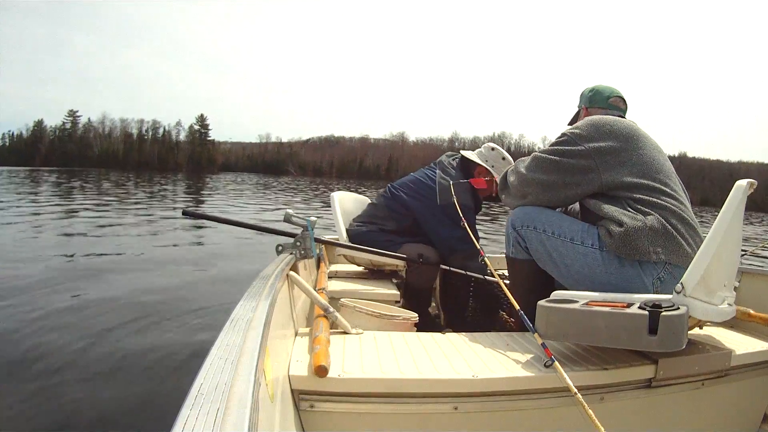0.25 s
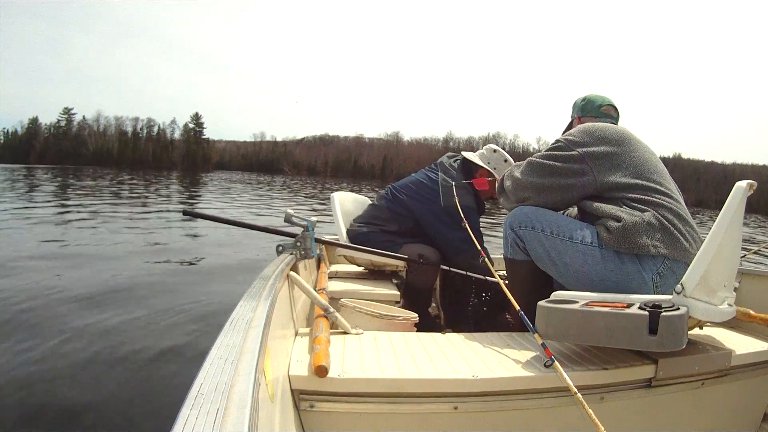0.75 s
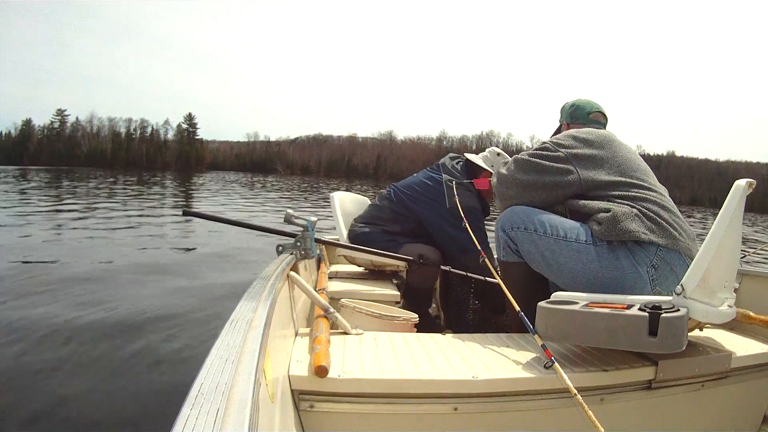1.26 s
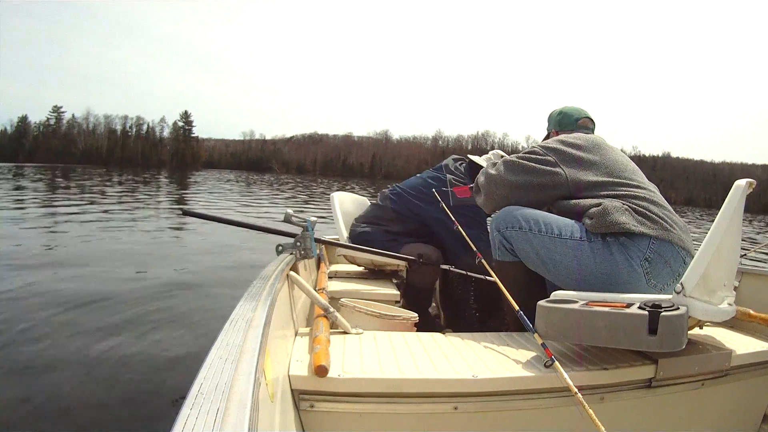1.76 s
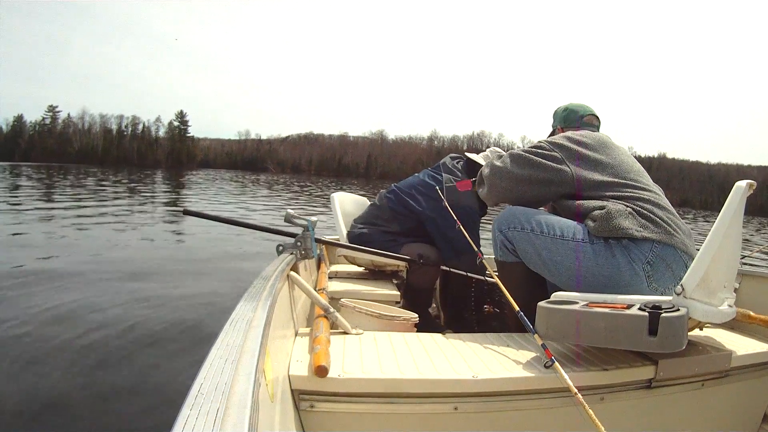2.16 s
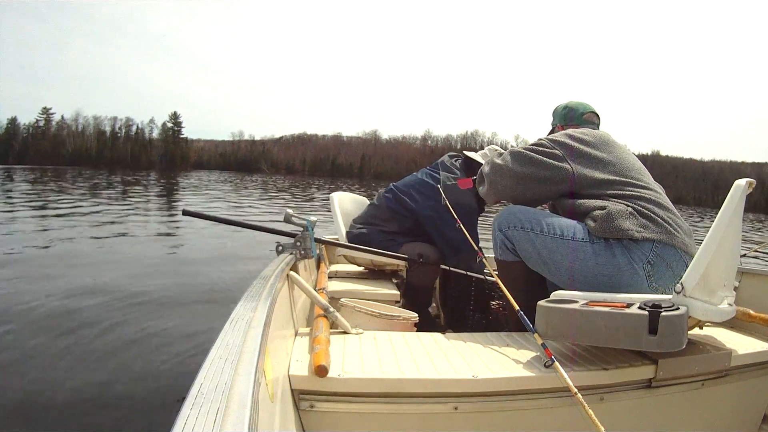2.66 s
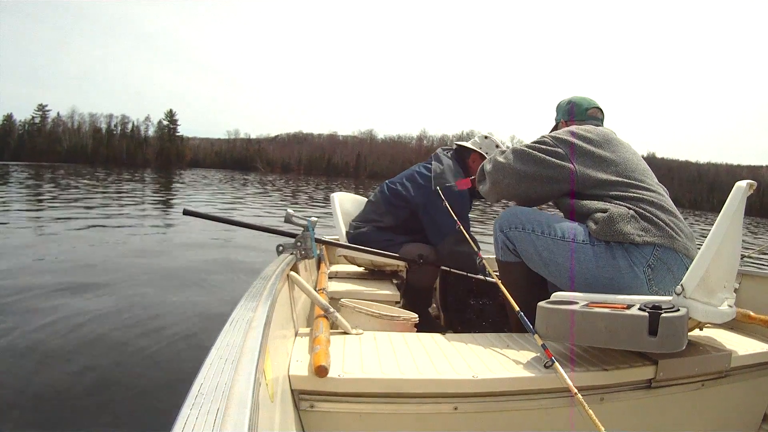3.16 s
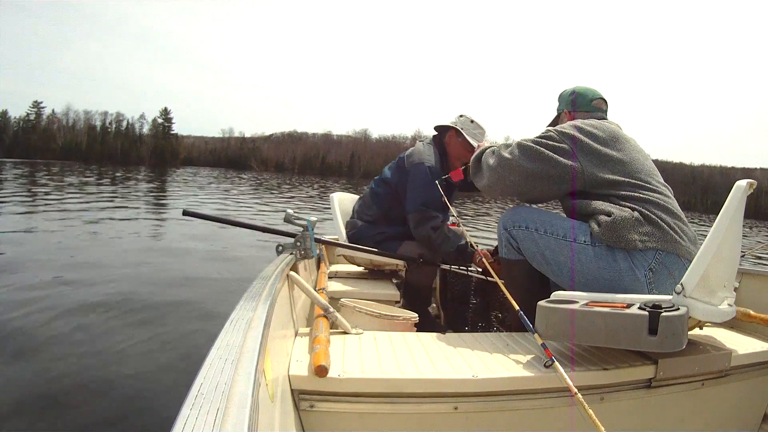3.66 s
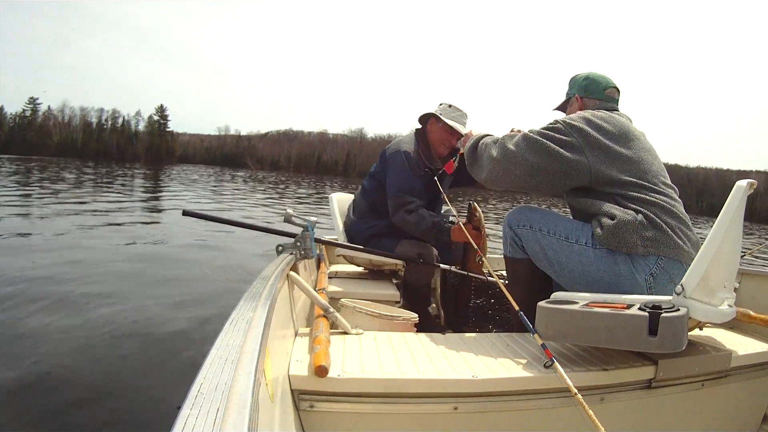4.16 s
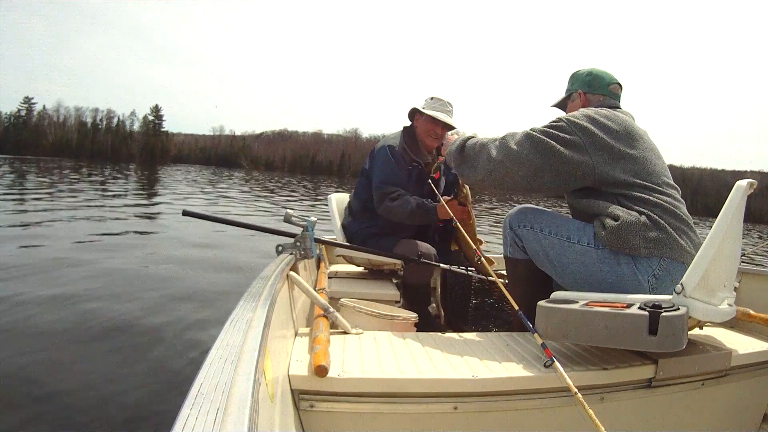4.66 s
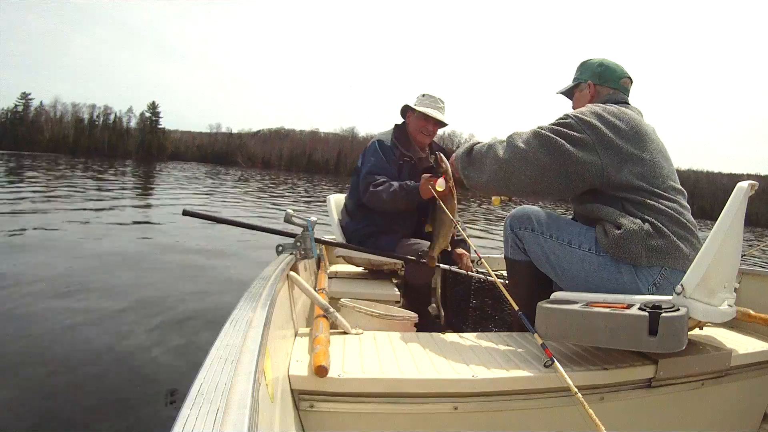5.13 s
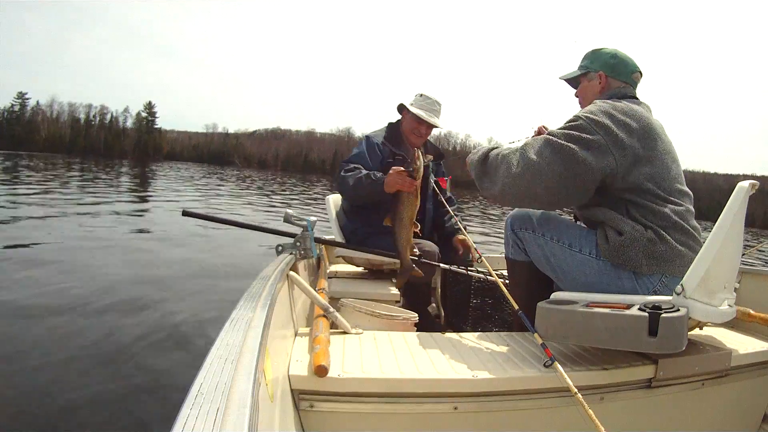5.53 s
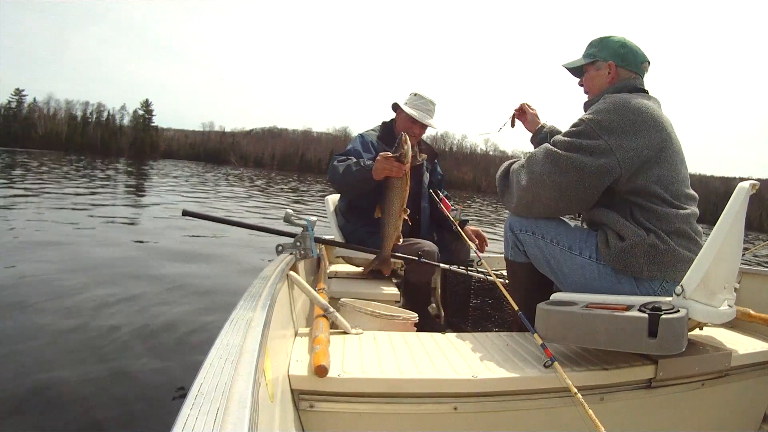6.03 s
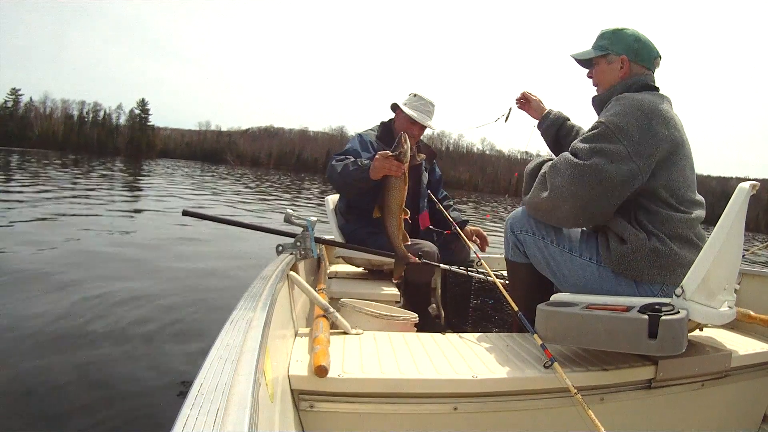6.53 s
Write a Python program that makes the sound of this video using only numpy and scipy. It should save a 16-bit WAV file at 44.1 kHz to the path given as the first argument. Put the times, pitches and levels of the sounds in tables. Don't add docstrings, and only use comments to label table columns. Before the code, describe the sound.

A small outboard idles with a low shuddering throb and a rapid dry plastic rattle, while gear knocks and clunks inside a metal boat.

```python
import sys
import numpy as np
from scipy import signal
from scipy.fft import rfft, irfft
from scipy.io import wavfile
from scipy.ndimage import uniform_filter1d

SR = 44100
rng = np.random.default_rng(int(sys.argv[2]) if len(sys.argv) > 2 else 0)


def master_out(mix):
    frames = np.transpose(np.atleast_2d(mix))
    ceiling = np.clip(frames, -1, 1)
    pcm = np.round(ceiling * 32767).astype(np.int16)
    wavfile.write(sys.argv[1], SR, pcm)


def field_ratio(decibels):
    return 10 ** (np.asarray(decibels, dtype=float) / 20)


N = 299439

TURN_S = 0.0455
HUM_REST_DB = -45


def time_s():
    return np.arange(N) / SR


def rms_one(x):
    return x / np.sqrt(np.mean(x ** 2) + 1e-20)


def drift(rate_hz):
    r = np.exp(-80 * np.pi * rate_hz / SR)
    slow = signal.lfilter([1], [1, -2 * r, r * r], rng.standard_normal(N // 40 + 2002))[2000:]
    return np.interp(np.arange(N) / 40, np.arange(len(slow)), rms_one(slow))


def clicks(at_s, sizes):
    train = np.zeros(N)
    index = np.round(np.asarray(at_s) * SR).astype(int)
    np.add.at(train, np.clip(index, 0, N - 1), sizes)
    return train


def ring(train, hz, t60_s):
    r, w = field_ratio(-60 / (t60_s * SR)), 2 * np.pi * hz / SR
    return signal.lfilter([0, np.sin(w)], [1, -2 * r * np.cos(w), r * r], train + 1e-18)


def resonant_noise(peaks, drive):
    out = 0
    for k, (hz, width_hz, db) in enumerate(peaks):
        r = np.exp(-np.pi * width_hz / SR)
        zeros = [(1 - r * r) / 2, 0, (r * r - 1) / 2]
        poles = [1, -2 * r * np.cos(2 * np.pi * hz / SR), r * r]
        out = out + (-1) ** k * field_ratio(db) * signal.lfilter(zeros, poles, drive)
    return rms_one(out)


def rattle_hits():
    # first_hit_s, turn_ms, hit_count, peak_db
    runs = [(.0328, 48.0, 8, -29.5), (.4174, 45.3, 2, -28.5), (.507, 45.5, 1, -35), (.5578, 46.1, 6, -29.5),
            (.8342, 45.5, 1, -33.5), (.8856, 46.6, 18, -29.5), (1.7283, 46.9, 6, -30.5),
            (2.015, 45.6, 6, -29.5), (2.2904, 50.0, 3, -29.5), (2.4346, 47.8, 14, -30.5),
            (3.1057, 46.6, 6, -31), (3.3919, 46.1, 7, -30.5), (3.7709, 44.9, 4, -30.5),
            (4.1185, 46.0, 4, -31), (4.2981, 52.5, 2, -32), (4.4478, 45.4, 6, -30.5),
            (4.7762, 45.2, 3, -32), (4.9066, 45.5, 1, -39), (5.1185, 46.2, 3, -33), (5.389, 45.5, 1, -40),
            (5.5022, 40.1, 2, -32), (5.5893, 45.5, 1, -32.5), (5.6418, 45.5, 1, -36),
            (5.6943, 45.5, 1, -32), (5.7335, 44.0, 9, -31), (6.1242, 45.9, 2, -32.5), (6.221, 45.5, 1, -49),
            (6.2743, 42.5, 6, -31), (6.531, 44.3, 5, -32)]
    limp_s, last_hit_db, first_hit_db = 0.0008, -2, -2
    hits = []
    for first_s, turn_ms, count, db in runs:
        hits += [(first_s + turn_ms / 1000 * k, db) for k in range(round(count))]
    s, db = np.transpose(hits)
    steps = np.round(np.diff(s) / TURN_S)
    turn, silent = np.r_[0, np.cumsum(steps)], steps > 1
    db = db + last_hit_db * np.r_[silent, True] + first_hit_db * np.r_[False, silent]
    return s - limp_s * (-1) ** turn, turn, db


def crank_turns():
    s, turns, _ = rattle_hits()
    turns = np.r_[-(s[0] + 1) / TURN_S, turns, turns[-1] + (8 - s[-1]) / TURN_S]
    s = np.r_[-1, s, 8]
    return uniform_filter1d(np.interp(time_s(), s, turns), size=6000, mode="nearest")


def shake(turns):
    # start_s, swing_db, limp_db (every other turn, against the swing)
    swings = [(0.0, -13.5, -1), (0.05, -13, -7), (1.21, -10, -7), (1.99, -13.5, -14.5), (2.19, -11, -10),
              (3.31, -15, -14), (3.42, -13, -24), (3.82, -19, -6), (3.88, -30, 0), (3.93, -21, -13),
              (4.12, -13.5, -5.5), (4.74, -18.5, -14.5), (4.84, -22, 1.5), (5.62, -17.5, -4.5),
              (5.82, -10, -19), (6.17, -14, -10), (6.52, -9.5, -20.5), (6.79, -21.5, 2.5)]
    at_s, swing_db, limp_db = np.transpose(swings)
    swing_db, limp_db = (np.interp(time_s(), at_s, db) for db in (swing_db, limp_db))
    third_db = -41 + 6.5 * drift(3.3)

    def swing(db):
        return uniform_filter1d(field_ratio(db), size=2600, mode="nearest")

    def wave(order, lead_turns):
        return np.sqrt(2) * np.cos(2 * np.pi * (order * turns + lead_turns))

    first = swing(swing_db) * wave(0.99, 0.085)
    half = swing(swing_db + limp_db) * wave(3 / 2, 0.19 + 0.23 * drift(0.69))
    third = field_ratio(-6) * swing(third_db) * wave(3, 0.13 * drift(1.5))
    return first + half + third


def rattle():
    # pitch_hz, level_db, t60_s
    housing_modes = [(2500, -12.5, 0.0043), (3080, -45.5, 0.0027), (3556, -27, 0.031), (3700, -7.5, 0.019),
                     (4686, -12.5, 0.0092), (4936, -23.5, 0.026), (5816, -7, 0.012), (6484, -4.5, 0.0049),
                     (6370, -13, 0.013), (7300, -28.5, 0.01), (7990, -19.5, 0.0054), (9120, -12.5, 0.011)]
    s, _, db = rattle_hits()
    chance = rng.standard_normal((len(s), 8))
    db = db + 0.6 * rng.standard_normal(len(s))

    rebound = np.clip(0.34 + 0.2 * chance[:, 0], 0, 0.75)
    rebound_s = s + 0.0029 + 0.0005 * np.clip(chance[:, 1], -2, 2)
    after = field_ratio(db - 14) * chance[:, 6:].T
    hits = clicks(np.r_[s, rebound_s, rebound_s + 0.0013, rebound_s + 0.0031],
                  np.r_[field_ratio(db), field_ratio(db) * rebound, after.ravel()])
    contact = signal.butter(3, [2000, 7800], "band", fs=SR, output="sos")
    hits = signal.sosfilt(contact, hits + 1e-18)

    which = np.searchsorted(s - 0.01, time_s())
    octaves = np.log2(np.array(housing_modes)[:, 0] / 3700)
    dull_db = 0.45 * np.outer(np.r_[0, db - np.median(db)], octaves)
    colour = field_ratio(dull_db - 0.58 + 1.36 * rng.standard_normal(dull_db.shape))
    out = 0
    for k, (hz, mode_db, t60_s) in enumerate(housing_modes):
        out = out + field_ratio(mode_db) * ring(hits * colour[which, k], hz, t60_s)

    back_s = s + 0.0275 + 0.0012 * chance[:, 2]
    lens_fade_db = 0.5 * s
    back = field_ratio(db - 21 - lens_fade_db + 7.6 * np.clip(chance[:, 3], -2, 1.3))
    buzz = field_ratio(db - 16.5) * np.tanh(chance[:, 5:].T)
    lens = clicks(np.r_[back_s, back_s + 0.0006, back_s + 0.0075, s + 0.0002, s + 0.0012, rebound_s],
                  np.r_[back, back * chance[:, 4], back * chance[:, 1] / 3, buzz.ravel()])
    out = out + ring(lens, 13600, 0.004)
    return out + field_ratio(-5) * ring(lens, 14700, 0.004) + field_ratio(-10) * ring(lens, 10500, 0.002)


def hum_level_db():
    # peak_s, peak_db, rise_s, fall_s
    surges = [(0.0, -22, .05, 0.093), (.4, -28.5, 0.37, 0.046), (.68, -34, 0.26, .24),
              (.98, -28.5, 0.068, 0.28), (1.47, -39.5, .17, 0.15), (1.81, -31, 0.19, 0.35),
              (2.48, -34, 0.32, .8), (3.06, -36, 0.046, .8), (3.97, -31.5, 0.15, 0.17),
              (4.27, -32.5, .28, .15), (4.52, -27, .11, .12), (4.78, -32.5, 0.11, 1.6),
              (5.41, -30, .26, .8), (5.94, -34, .18, .17), (6.24, -34, 0.069, 0.12),
              (6.39, -30.5, 0.034, .15), (6.66, -32.5, .06, .26)]
    t, out = time_s(), np.full(N, float(HUM_REST_DB))
    for s, db, rise_s, fall_s in surges:
        away = np.where(t < s, (s - t) / rise_s, (t - s) / fall_s)
        out = np.maximum(out, db + (HUM_REST_DB - db) * away)
    return out


def hum(turns):
    # centre_hz, width_hz, level_db
    air_modes = [(276, 15.9, 2), (301, 28.8, -5), (339.7, 27.6, -17.5), (234.2, 10.7, -14.5),
                 (153.6, 11, -11.5)]
    strength = field_ratio(5.9 * rng.standard_normal(400))[(turns % 400).astype(int)]
    puff = np.exp(-3.5 * (turns % 1)) * strength
    x = resonant_noise(air_modes, rng.standard_normal(N) * (1.03 + 0.35 * puff))
    x = signal.sosfilt(signal.butter(4, 400, fs=SR, output="sos"), x)
    return rms_one(x / uniform_filter1d(x ** 2, size=3500) ** 0.3)


def clatter():
    # centre_hz, width_hz, level_db
    cowling_modes = [(820, 81, -5), (1103.4, 22, 1.5), (1200, 32, -5), (1620, 132, -0.5), (2073, 103, -3.5),
                     (2410, 133, -8.5)]
    x = resonant_noise(cowling_modes, rng.standard_normal(N) * field_ratio(2.57 * drift(28)))
    return signal.sosfilt(signal.butter(3, 740, "high", fs=SR, output="sos"), x)


def thumps(turns):
    # start_s, peak_db
    hard_firings = [(.139, -30.5), (.563, -26.5), (.643, -26), (1.684, -29), (1.811, -27), (1.934, -29),
                    (2.298, -27.5), (2.581, -27), (3.52, -30), (3.962, -27), (4.21, -27.5), (4.496, -26),
                    (4.617, -29), (4.69, -25.5), (4.728, -26), (4.879, -26), (4.982, -23.5), (5.026, -27),
                    (5.095, -28), (5.274, -27), (5.319, -27), (5.36, -25), (5.404, -30), (5.643, -28),
                    (5.772, -25.5), (5.912, -30), (5.948, -32), (6.217, -30), (6.65, -22), (6.707, -24.5)]
    s, db = np.transpose(hard_firings)
    fired_s = np.flatnonzero(np.diff(turns // 2) > 0) / SR
    faint = clicks(fired_s, field_ratio(-39.5 + 4 * rng.standard_normal(len(fired_s))))
    blows = signal.lfilter([0.002], [1, -1.92, 0.9216], clicks(s, field_ratio(db)) + faint)
    out = field_ratio(-2) * ring(blows, 276.7, 0.15) + field_ratio(-6.5) * ring(blows, 319, 0.066)
    return out + field_ratio(-22.5) * ring(blows, 367, 0.036)


def chatter():
    # start_s, peak_db, pitch_hz
    strikes = [(0.1852, -38, 1520), (0.5526, -42.5, 1670), (0.6366, -44, 1600), (0.7453, -39, 1510),
               (1.067, -45, 1490), (1.7308, -41, 1620), (2.0193, -43, 1620), (2.3905, -44, 1640),
               (2.487, -44, 1520), (2.583, -41, 1570), (2.7387, -36, 1730), (3.057, -43, 1630),
               (4.08, -43.5, 1620), (4.312, -43, 1580), (4.401, -41.5, 1520), (4.4988, -41.5, 1590),
               (4.788, -44, 1570), (4.8797, -38.5, 1575), (5.0719, -45, 1550), (5.2644, -41, 1640),
               (5.3411, -46, 1760), (5.452, -38, 1580), (5.509, -35.5, 1540), (5.6356, -37, 1560),
               (5.697, -39.5, 1550), (5.8692, -34, 1560), (6.346, -39.5, 1620), (6.6086, -29, 1710),
               (6.7121, -44, 1620)]
    return sum(ring(clicks([s + 0.00186, s + 0.005586], field_ratio(db - 4)), hz, 0.036) for s, db, hz in strikes)


def motor(turns):
    hum_db = hum_level_db()
    clatter_db = -54 + 0.14 * (hum_db - HUM_REST_DB) - 0.22 * time_s()
    return field_ratio(hum_db - 2) * hum(turns) + field_ratio(clatter_db - 2) * clatter() + thumps(turns) + chatter()


def knocks():
    # start_s, peak_db, centre_hz, width_octaves, scuffle_s
    hard_knocks = [(1.969, -30, 2180, .25, .027), (1.968, -35, 2500, 0.55, .022),
                   (2.734, -24, 2100, .12, .041), (2.736, -35.5, 1350, 0.43, .05),
                   (3, -40, 3100, .3, 0.026), (3.058, -32.5, 1950, 0.78, .04),
                   (3.06, -27.5, 950, 0.37, 0.076), (3.955, -44, 1010, 0.7, .045),
                   (3.96, -29, 575, .15, .12), (5.337, -28.5, 2280, 0.19, .008),
                   (5.339, -24.5, 1665, .046, .02), (5.338, -31.5, 1010, 0.2, .06),
                   (5.432, -29.5, 2140, 0.053, .006), (6.157, -37.5, 1600, 0.67, .042),
                   (6.166, -30, 820, 0.21, .16), (6.608, -17, 2250, 0.14, .03),
                   (6.607, -28.5, 1500, 0.19, .02), (6.61, -33, 3400, .37, 0.027),
                   (6.62, -32, 1160, 0.35, .06)]
    # start_s, peak_db, centre_hz, width_octaves
    scuffs = [(.55, -37, 2600, 0.54), (.9, -36, 2500, .37), (1.0, -37, 1300, .18),
              (1.37, -39.5, 3000, 0.93), (1.549, -37, 2110, 0.46), (2.275, -39, 3300, .3),
              (2.872, -41, 2200, 0.54), (2.87, -39, 3600, .2), (4.579, -41, 2030, .5),
              (5.305, -42, 2100, .76), (5.869, -38, 1510, .33), (6.585, -41, 1200, .32),
              (6.7, -39.5, 2000, 0.8), (6.77, -43, 1540, .15)]
    # pitch_hz, t60_s
    panel_modes = [(575, 0.036), (815, 0.07), (885, 0.084), (1060, 0.07), (1100, 0.069), (1210, 0.048),
                   (1380, 0.06), (1550, 0.077), (1670, 0.11), (1960, 0.028), (2080, 0.06), (2240, 0.049),
                   (2370, 0.035), (2510, 0.036), (2750, 0.046), (3240, 0.059), (3700, 0.068), (4000, 0.072),
                   (4600, 0.039)]
    scuff_s, wet_damping = 0.04, 0.83
    twin_ratio, twin_db = 1.042, -5.5
    rows = [*hard_knocks, *((*row, scuff_s) for row in scuffs)]
    chance = np.tanh(2 * rng.standard_normal((len(rows), len(panel_modes), 60)))
    chance[:, :, 0] = 1.95
    late, out = np.linspace(0, 1, 60), 0
    for k, (hz, t60_s) in enumerate(panel_modes):
        train = 0
        for (s, db, centre_hz, octaves, scuffle_s), draws in zip(rows, chance[:, k]):
            near = np.exp(-0.5 * (np.log2(hz / centre_hz) / max(octaves, 0.05)) ** 2)
            swell = 1 - np.exp(-(scuffle_s * late + 0.001) * hz / 2.5)
            dying = field_ratio(db - 19.5 - 26 * late) / np.sqrt(1 + scuffle_s / 0.0083)
            train = train + clicks(s + 1.5 * scuffle_s * late, dying * near * swell * draws)
        soft = signal.butter(1, [hz * 0.8, hz * 1.25], "band", fs=SR)
        struck = signal.lfilter(*soft, train) * 5500 / hz
        out = out + ring(struck, hz, t60_s * wet_damping)
        out = out + ring(struck * field_ratio(twin_db), hz * twin_ratio, t60_s * wet_damping)
    return out


def lure():
    # start_s, peak_db, pitch_hz, t60_s
    parts = [(5.335, -56, 5290, 0.13), (5.336, -59, 13800, 0.1), (5.336, -63, 9900, 0.046),
             (6.678, -54, 5450, .05), (6.69, -53, 5480, 0.057), (6.7, -58, 5420, .04),
             (6.69, -65, 13800, 0.076), (6.715, -54, 13600, .07), (6.714, -54, 5200, .04),
             (6.716, -56, 5800, 0.088), (6.715, -60, 7300, 0.067)]
    out = 0
    for s, db, hz, t60_s in parts:
        train = clicks([s, s + 0.006], field_ratio(db))
        out = out + ring(train, hz, t60_s) + ring(train, hz * 1.017, t60_s)
    return out


def wash():
    band = signal.butter(2, [430, 760], "band", fs=SR, output="sos")
    level_db = -73.5 + 0.86 * time_s() + 0.2 * drift(1.5)
    return field_ratio(level_db) * rms_one(signal.sosfilt(band, rng.standard_normal(N)))


def bed():
    # frequency_hz, density_db (per Hz)
    spectrum = [(20, -7.5), (38, 4.5), (45, -15.5), (54, -19), (68, -13), (115, -17.5), (200, -31.5),
                (330, -33), (450, -51), (700, -60.5), (1400, -50.5), (2800, -58), (8000, -61.5),
                (15500, -63.5)]
    hz = np.maximum(np.fft.rfftfreq(N, 1 / SR), 1)
    table_hz, table_db = np.transpose(spectrum)
    colour = field_ratio(np.interp(np.log(hz), np.log(table_hz), table_db))
    rumble_rms = np.sqrt(np.sum(colour[(hz > 45) & (hz < 220)] ** 2) * 2 / N)
    return field_ratio(-40.5) / rumble_rms * irfft(rfft(rng.standard_normal(N)) * colour, N)


def scene():
    turns = crank_turns()
    return (shake(turns) + rattle() + motor(turns) + knocks() + lure() + wash() + bed())[None]


def low_pass(x):
    return signal.sosfilt(signal.butter(12, 15640, fs=SR, output="sos"), x)


def record(dry):
    top_cut = signal.cheby2(8, 30, 15700, fs=SR, output="sos")
    return low_pass(signal.sosfilt(top_cut, dry) + 0.0457)


dry = scene()
out = record(dry)
master_out(out)
```